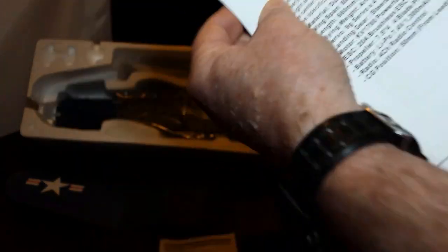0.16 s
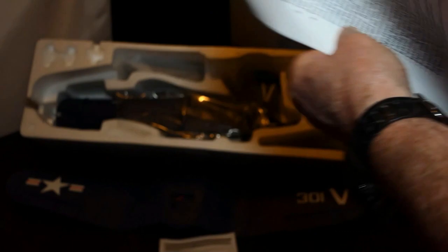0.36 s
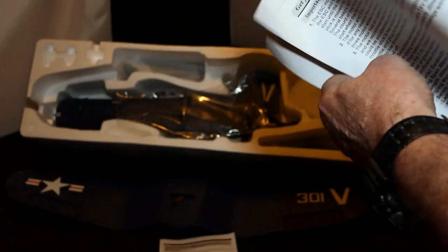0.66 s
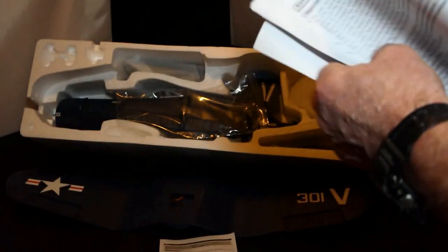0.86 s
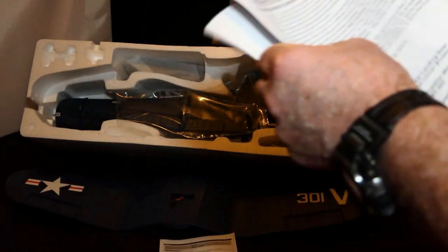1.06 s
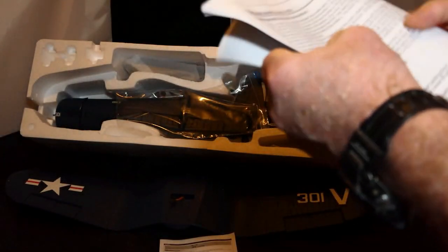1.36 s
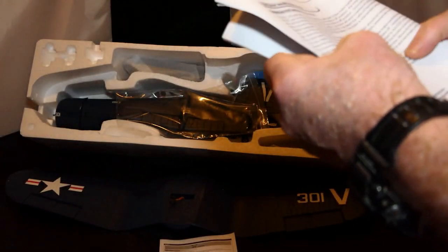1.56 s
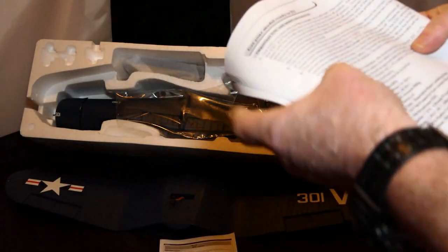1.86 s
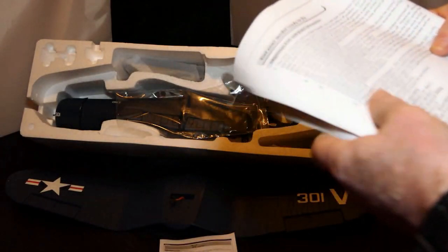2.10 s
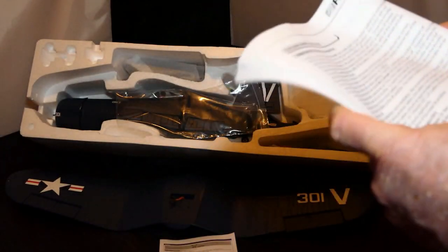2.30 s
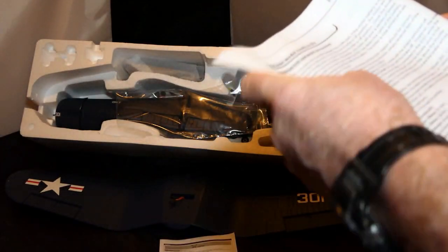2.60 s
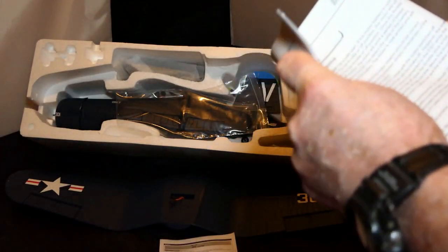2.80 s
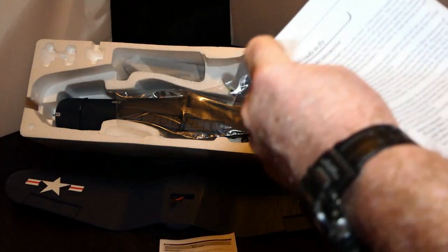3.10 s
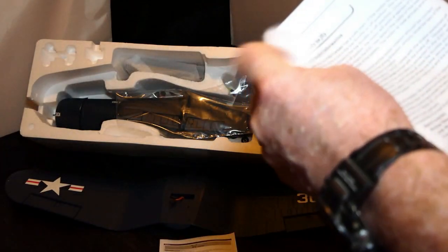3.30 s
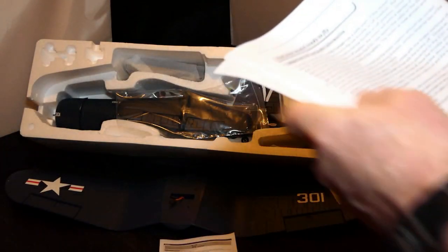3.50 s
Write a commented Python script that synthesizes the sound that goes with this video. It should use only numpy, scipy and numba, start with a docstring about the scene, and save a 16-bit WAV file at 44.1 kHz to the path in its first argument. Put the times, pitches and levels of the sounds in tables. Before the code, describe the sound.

Thin paper booklet handled close up, crackling sharply at first, then rustling more softly

```python
"""Bending a paper booklet

Hands turn and bend the pages of a thin paper booklet close to two microphones in a small quiet room.
Creases snap as short noise bursts; sliding sheets hiss and rustle as shaped noise with scattered clicks.
The page stack flaps as low noise and thumps with a few low modes; taut patches of paper ring hollow.
The room answers the paper with a short tail of dense reflections, over a faint steady air noise."""
import sys
import numpy as np
from scipy import signal
from scipy.fft import rfft, irfft
from scipy.io import wavfile
from scipy.ndimage import uniform_filter1d
from numba import njit

SR = 44100
rng = np.random.default_rng(int(sys.argv[2]) if len(sys.argv) > 2 else 0)


def volts_from_decibels(level):
    """Turn decibel levels (scalar or array-like) into linear amplitude factors."""
    exponent = np.asarray(level, float) / 20
    return 10 ** exponent


def transcribe(signal):
    """Save signal, clipped to [-1, 1], as a 16-bit WAV file at the path in sys.argv[1]."""
    frames = np.atleast_2d(signal).T
    limited = np.clip(frames, -1, 1)
    pcm = np.round(limited * 32767).astype(np.int16)
    wavfile.write(sys.argv[1], SR, pcm)


N = 160965  # length in samples

# tone of the background air: f/Hz, relative level/dB
AIR_TONE = [(45,14),(100,0),(400,1.5),(1500,-9),(4000,-10.5),(8000,-37),(16000,-42)]
# pushes that make the page stack thump: t/s, level/dB before each push gets its own mix
STACK_THUMPS = [(0.033, -37), (0.102, -43), (0.18, -40), (0.277, -38.5), (0.368, -40), (0.441, -43.5),
                (0.515, -33.5), (0.906, -35.5), (1.034, -45), (1.205, -29), (1.459, -40), (2.313, -38),
                (2.444, -39.5), (2.623, -40.5), (2.667, -39), (2.749, -36), (3.106, -47), (3.219, -38),
                (3.477, -41)]
# low modes of the page stack before each push varies them: f/Hz, relative level/dB, time to fall 60 dB/s
STACK_MODES = [(160, -10, .05), (228, 0, .07), (393, -10, .035)]
# taut patches of paper that ring hollow: t/s, level/dB, centre f/Hz
HOLLOW_RINGS = [(.106,-16,1690),(.323,-24,1886),(.757,-27,1020),(.829,-26.5,580),(.835,-27.5,1710),(.997,-22,1960),(1.043,-26,688),(1.263,-32,835),(1.459,-29.5,1330),(1.585,-37.5,725),(1.824,-33.5,850),(2.364,-32.5,1050),(2.647,-29.5,3530)]
# one broad bend of the whole stack: start t/s, length/s, level/dB before flutter, from f/Hz, to f/Hz
STACK_BEND = (.565, .14, -43, 250, 148)
# sheets sliding: t/s, hiss level/dB before flicker, resonance of the curled page f/Hz
SHEET_SLIDES = [(0,-50,3500),(.035,-65,3500),(.06,-47,3560),(.169,-45.5,3470),(.199,-44.5,4500),(.24,-50,3800),(.288,-50,3570),(.454,-53,3650),(.485,-54,4400),(.515,-39.5,3970),(.535,-27.5,5140),(.575,-49,4450),(.639,-54.5,2940),(.7,-41.5,3500),(.758,-39,2930),(.794,-45.5,2930),(.872,-50,2950),(.924,-52,4730),(1.007,-37.5,2450),(1.086,-47,3650),(1.221,-45,3250),(1.284,-48.5,3150),(1.402,-55.5,4670),(1.471,-49.5,3000),(1.531,-60.5,3120),(1.69,-49.5,4270),(1.819,-52,3720),(1.87,-56.5,3550),(1.93,-52,4140),(1.98,-63.5,4000),(2.015,-54.5,3970),(2.147,-44.5,3430),(2.218,-53,4550),(2.314,-44,3360),(2.392,-62.5,3470),(2.47,-44,2780),(2.55,-50.5,3520),(2.603,-51,4000),(2.647,-43.5,4440),(2.78,-44.5,4440),(2.84,-61.5,4060),(2.907,-67,3900),(2.953,-51.5,4230),(3.007,-50,3550),(3.13,-52,3380),(3.18,-68,3100),(3.235,-50.5,2840),(3.279,-38.5,2400),(3.31,-51,2700),(3.358,-63.5,2770),(3.424,-44,2960),(3.47,-50.5,3900),(3.65,-49,3400)]
# booklet bending: t/s, mid rustle level/dB, low flapping level/dB, both before flicker
BOOKLET_BENDS = [(0.0, -88, -50), (0.018, -54, -68), (0.049, -37, -56), (0.156, -43.5, -51),
                 (0.198, -42, -36), (0.259, -61, -57), (0.341, -45.5, -50), (0.432, -51, -53),
                 (0.589, -37.5, -44), (0.691, -49, -47), (0.751, -39, -43.5), (0.801, -53, -51),
                 (0.841, -43, -52), (0.895, -57, -60), (1.007, -36.5, -46.5), (1.082, -46, -50),
                 (1.217, -44.5, -40.5), (1.28, -39, -58), (1.398, -61, -75), (1.469, -50, -56),
                 (1.546, -58.5, -68), (1.599, -48, -54), (1.708, -52.5, -61), (1.825, -47, -56),
                 (1.863, -61, -70), (1.905, -51, -56), (1.983, -59, -76), (2.337, -53, -54.5),
                 (2.374, -55.5, -57), (2.594, -57.5, -51), (2.663, -47.5, -48), (2.778, -49, -53),
                 (2.907, -68, -76), (2.963, -59.5, -52), (3.082, -60, -52.5), (3.237, -53.5, -51),
                 (3.364, -58.5, -60), (3.65, -55, -51)]
# tone of the sliding hiss: f/Hz, relative level/dB
HISS_TONE = [(900,-35.5),(1700,6),(3000,4.5),(6000,8.5),(8200,3.5),(10500,4),(13000,-10),(16000,-21)]
# tone of the mid rustle: f/Hz, relative level/dB
RUSTLE_TONE = [(250,-24),(450,-15),(700,2.5),(1300,1),(2200,-4),(4000,-16.5)]
# tone of the low flapping: f/Hz, relative level/dB
FLAP_TONE = [(40,2),(100,-8.5),(160,-1.5),(228,3.5),(300,0.5),(400,-6),(800,-16)]
# creases snapping: t/s, then the peak level/dB in each of the four bands below
CREASE_SNAPS = [(0.0284, -36, -72, -37, -61), (0.037, -12.5, -15, -8, -7), (0.1046, -15.5, -9, -8, -12.5),
                (0.1795, -24, -18.5, -23, -49), (0.1972, -36, -23, -18, -17), (0.202, -44, -33, -25, -32),
                (0.226, -38, -22, -19.5, -22.5), (0.2842, -31.5, -44, -57, -54),
                (0.3224, -43, -18.5, -19, -35), (0.417, -58, -34, -44, -45.0),
                (0.4946, -29, -25, -21.5, -48), (0.5259, -31, -23, -25, -32),
                (0.5323, -29.5, -22, -9.5, -23), (0.538, -55, -20, -10, -15), (0.6327, -24, -29, -28, -48),
                (0.7329, -24.5, -22.5, -23, -33), (0.7538, -23, -19, -16, -19.5),
                (0.7591, -23, -43, -20, -23), (0.8269, -30, -17.5, -14, -43), (0.9624, -35, -24, -21, -25),
                (0.9954, -55, -16, -21, -21.5), (1.0238, -40, -37, -23.5, -41),
                (1.0415, -21.5, -17.5, -26, -43), (1.0631, -42, -43, -27, -24.5),
                (1.106, -24.5, -28, -29, -27.5), (1.1568, -29.5, -48, -44, -46),
                (1.1749, -25, -28, -37, -45), (1.2064, -23.5, -30, -24, -28),
                (1.2242, -41, -27.5, -23, -36), (1.2608, -25.5, -32, -38.0, -47), (1.3, -25, -35, -36, -48),
                (1.4583, -26, -23.5, -31, -35), (1.5081, -45, -33.5, -46, -58),
                (1.5462, -35.5, -54, -39.5, -58), (1.5863, -30, -27.5, -39, -56),
                (1.6185, -59, -32.5, -48, -56), (1.6415, -29.5, -39, -50, -51),
                (1.7328, -49, -27, -20.5, -28), (1.8024, -57, -32, -32, -47),
                (1.8216, -30, -25.5, -34, -47.0), (1.886, -40, -26.5, -22.5, -36.5),
                (1.9217, -47, -41, -29.5, -28), (2.242, -43, -57, -30, -32.5),
                (2.2828, -43.5, -33, -30.5, -29.5), (2.3146, -57, -35, -30, -30.5),
                (2.3644, -47, -34, -47, -54), (2.4078, -53, -31, -16.5, -26), (2.4453, -35, -39, -31, -55),
                (2.5688, -60, -54, -28, -48), (2.6466, -37, -37, -29, -50), (2.6698, -34, -29, -34, -52),
                (2.75, -31, -25.5, -29, -53), (2.7993, -37.5, -34.5, -42, -61),
                (2.9475, -35.5, -35.5, -50, -46), (3.186, -38.5, -34, -39, -58),
                (3.2209, -34.5, -36, -42, -45), (3.4764, -39, -30.5, -48, -48),
                (3.5266, -37, -37.5, -51, -55)]
# bands of a snap: low f/Hz, high f/Hz
CREASE_BANDS = [(330, 1250), (1250, 2700), (2700, 5500), (5500, 12000)]


def unit(x):
    """Scales a sound to rms 1."""
    return x / np.sqrt(np.mean(x ** 2))


def colour(x, points):
    """Gives x the tone drawn by (f/Hz, level/dB) points, then scales it to rms 1."""
    points = np.array(points, float)
    hz = np.maximum(np.fft.rfftfreq(N, 1 / SR), 1)
    level_db = np.interp(np.log(hz), np.log(points[:, 0]), points[:, 1])
    return unit(irfft(rfft(x) * volts_from_decibels(level_db), N))


def filtered(x, order, hz, kind):
    """Smooth filter: lets through the part of x that hz and kind describe."""
    return signal.sosfilt(signal.butter(order, hz, kind, fs=SR, output="sos"), x)


def decay(t, t60_s):
    """Fading that falls 60 dB in t60_s."""
    return np.exp(-np.log(1000) * t / t60_s)


def ring(hz, t60_s):
    """One decaying mode: a sine that fades, cut off at 0.12 s."""
    t = np.arange(int(.12 * SR)) / SR
    return np.sin(2 * np.pi * hz * t) * decay(t, t60_s)


def add(track, start_s, x):
    """Mixes x into the track from start_s on."""
    i = int(start_s * SR)
    track[i:i + len(x)] += x[:N - i]


def walk(rate_hz):
    """Random levels, each held 1 / rate_hz seconds, smoothed twice and scaled to rms 1."""
    hold = int(SR / rate_hz)
    steps = np.repeat(rng.standard_normal(N // 50), hold)[:N]
    return unit(uniform_filter1d(uniform_filter1d(steps, hold), hold))


def grains(per_s, spread_db):
    """Clicks at random moments with random sign: many small ones, few large ones."""
    present = rng.random(N) < per_s / SR
    size = np.minimum(rng.exponential(size=N), 4)
    sign = np.sign(rng.standard_normal(N))
    return unit(present * sign * volts_from_decibels(spread_db * size))


def curves(table):
    """Joins table rows by straight lines over time, one curve for each column after t/s."""
    rows = np.array(table, float)
    t = np.arange(N) / SR
    return [np.interp(t, rows[:, 0], column) for column in rows.T[1:]]


@njit
def moving_resonance(x, hz, width):
    """Band-pass whose centre follows hz; width is bandwidth / centre."""
    y, band_state, low_state = np.empty(len(x)), 0., 0.
    for i in range(len(x)):
        g = np.tan(np.pi * hz[i] / SR)
        v = (band_state + g * (x[i] - low_state)) / (1 + g * (g + width))
        band_state = 2 * v - band_state
        low_state += 2 * g * v
        y[i] = width * v
    return y


def air():
    """Steady shaped noise, drawn separately for each side."""
    level_db = -54
    noise = [colour(rng.standard_normal(N), AIR_TONE) for _ in range(2)]
    return volts_from_decibels(level_db) * np.array(noise)


def room(x):
    """Dense reflections as fading noise after a short gap, with a separate decay for the treble."""
    level_db, side_db, gap_s = -5, -0.5, 0.001
    low_t60_s, treble_t60_s = 0.16, 0.19
    renew_s = .2  # a fresh random reflection tail fades in this often, so no room tone persists
    t, hop = np.arange(int(.3 * SR)) / SR, int(renew_s * SR)
    wet = np.zeros((2, N + 3 * hop + len(t)))
    x = np.pad(x, (hop, 2 * hop))
    for i in range(0, N + hop, hop):
        noise = rng.standard_normal((2, len(t)))
        low = filtered(noise, 1, 2500, "low")
        tail = low * decay(t, low_t60_s) + (noise - low) * decay(t, treble_t60_s)
        tail = tail * np.clip(t / gap_s - 1, 0, 1)
        tail = tail / np.sqrt(np.sum(tail[0] ** 2))
        part = x[None, i:i + 2 * hop] * np.hanning(2 * hop)  # neighbouring pieces crossfade
        part = signal.fftconvolve(part, tail, axes=1)
        wet[:, i:i + part.shape[1]] += part
    mid, side = wet[:, hop:hop + N]
    side = filtered(side, 1, [352, 3000], "band")  # band in which the room differs left to right
    return volts_from_decibels(level_db) * (mid + volts_from_decibels(side_db) * side * np.array([[1], [-1]]))


def thumps():
    """Soft pushes ring the low modes of the page stack, each with its own mix and tuning."""
    mode_spread_db, tuning_spread = 2, .05  # tuning as a share of the mode frequency
    out = np.zeros(N)
    variation = rng.standard_normal((len(STACK_THUMPS), len(STACK_MODES), 2))
    push = np.hanning(110)  # about 2.5 ms
    for (start_s, db), push_variation in zip(STACK_THUMPS, variation):
        body = 0
        for (hz, mode_db, t60_s), (louder, higher) in zip(STACK_MODES, push_variation):
            mode = ring(hz * (1 + tuning_spread * higher), t60_s)
            body = body + volts_from_decibels(mode_db + mode_spread_db * louder) * mode
        body = np.convolve(body, push / push.sum())
        add(out, start_s, volts_from_decibels(db) * filtered(body, 3, [118, 960], "band"))
    return out


def hollow_rings():
    """Each taut patch rings as a loose cluster of four fading modes."""
    t60_s, spread = .03, .1  # spread as a share of the centre frequency
    out = np.zeros(N)
    detune = rng.uniform(-spread, spread, (len(HOLLOW_RINGS), 4))
    for (start_s, db, hz), shifts in zip(HOLLOW_RINGS, detune):
        cluster = sum(ring(hz * (1 + shift), t60_s) for shift in shifts) / 2
        add(out, start_s, volts_from_decibels(db) * cluster)
    return out


def stack_bend():
    """The bending stack gives one tone that glides down, swelling and fading with a fluttering level."""
    flutter_db = 7.6
    out = np.zeros(N)
    start_s, length_s, db, from_hz, to_hz = STACK_BEND
    progress = np.arange(int(length_s * SR)) / (length_s * SR)
    hz = to_hz + (from_hz - to_hz) * (1 - progress) ** 2
    tone = np.sin(2 * np.pi * np.cumsum(hz) / SR)
    level = volts_from_decibels(db + flutter_db * walk(63)[:len(progress)])
    add(out, start_s, level * np.sin(np.pi * progress) * tone)
    return out


def sliding_hiss():
    """Paper fibres hiss; the louder the hiss, the more of it passes through the curled page's resonance."""
    curl_width = .65  # width / centre
    curl_even_db, curl_slope = -41.5, .8  # hiss level for equal parts; dB gained per dB of hiss
    hiss_db, curl_hz = curves(SHEET_SLIDES)
    fibres = unit(rng.standard_normal(N) + volts_from_decibels(-3) * grains(1800, 3.3))
    curl = volts_from_decibels(curl_slope * (hiss_db - curl_even_db))
    resonance = moving_resonance(fibres, curl_hz, curl_width)
    resonance = unit(moving_resonance(resonance, curl_hz, curl_width))
    hiss = (colour(fibres, HISS_TONE) + curl * resonance) / np.sqrt(1 + curl ** 2)
    return hiss * volts_from_decibels(hiss_db + .8 * walk(30.13))


def bending():
    """Small creases crackle in the mids while the stack flaps as low noise; both levels flicker."""
    mid_db, low_db = curves(BOOKLET_BENDS)
    creases = rng.standard_normal(N) + volts_from_decibels(-1) * grains(400, 3)
    rustle = colour(creases, RUSTLE_TONE) * volts_from_decibels(mid_db + 2 * walk(39.99))
    flapping = colour(rng.standard_normal(N), FLAP_TONE) * volts_from_decibels(low_db + 2.5 * walk(13))
    return rustle + flapping


def slide():
    """Sheets slide and bend together."""
    return sliding_hiss() + bending()


def snaps():
    """Each crease gives a burst of about a millisecond with a click in it; the sheet rattles on briefly."""
    rise_s, click = .00025, 2.5  # click size relative to the burst noise
    rattle_db, rattle_t60_s = -12, 0.091
    out, t = np.zeros(N), np.arange(3000) / SR
    burst = t / rise_s * np.exp(1 - t / rise_s)
    shape = burst + volts_from_decibels(rattle_db) * decay(t, rattle_t60_s)
    noise = rng.standard_normal((len(CREASE_SNAPS), len(t))) * shape
    noise[:, int(rise_s * SR)] += click * np.sign(noise[:, 0])
    for k, (low_hz, high_hz) in enumerate(CREASE_BANDS):
        for row, part in zip(CREASE_SNAPS, filtered(noise, 3, [low_hz, high_hz], "band")):
            add(out, row[0], volts_from_decibels(row[k + 1]) * part / np.abs(part).max())
    return out


def scene():
    """Places the paper sounds in stereo, then adds the room's answer and the air."""
    left_minus_right_db = -1.6
    wide, wide_top, wide_top_hz = 0.19, 0.53, 8200  # extra left-right difference above wide_top_hz
    paper = snaps() + hollow_rings() + stack_bend() + thumps() + slide()
    other = slide()  # a second, unrelated sliding sound makes the two sides differ
    top = filtered(other, 2, wide_top_hz, "high")
    difference = (wide * other + wide_top * top) * np.array([[1], [-1]])
    pan = volts_from_decibels(np.array([[left_minus_right_db], [-left_minus_right_db]]) / 2)
    return (paper + difference) * pan + room(paper) + air()


def roll_off(x):
    """The treble ends steeply here."""
    return signal.sosfilt(signal.butter(12, 16470, fs=SR, output="sos"), x)


def record(dry):
    """The microphones lose deep bass and high treble; a steep filter then cuts the very top."""
    x = filtered(dry, 3, 118.5, "high")
    x = filtered(x, 2, 10460, "low")
    x = signal.sosfilt(signal.ellip(8, .2, 60, 15700, fs=SR, output="sos"), x)
    return roll_off(x)


dry = scene()
out = record(dry)
transcribe(out)
```